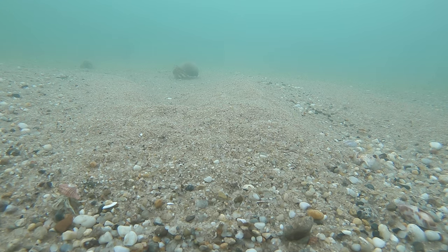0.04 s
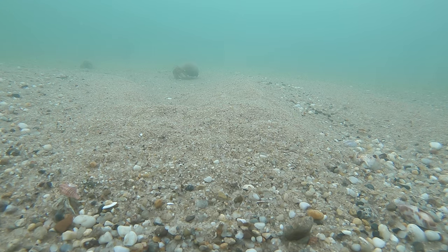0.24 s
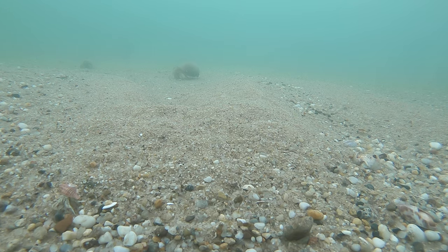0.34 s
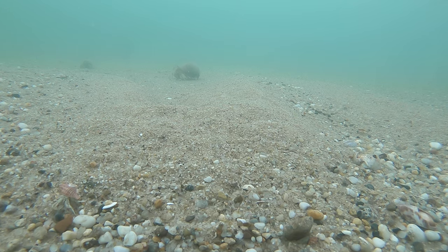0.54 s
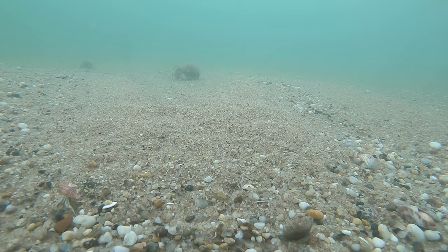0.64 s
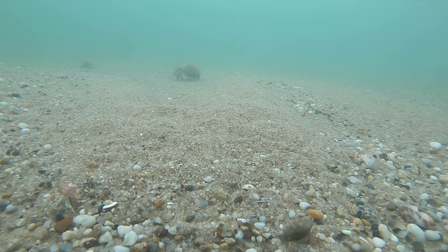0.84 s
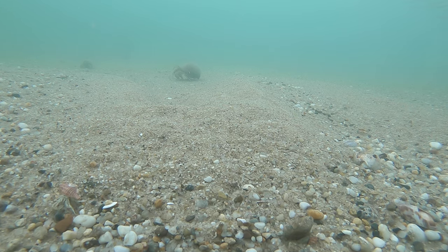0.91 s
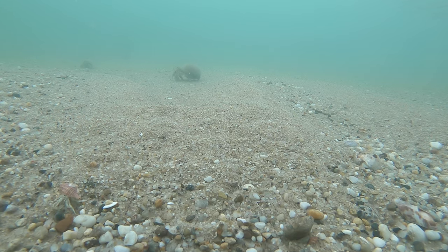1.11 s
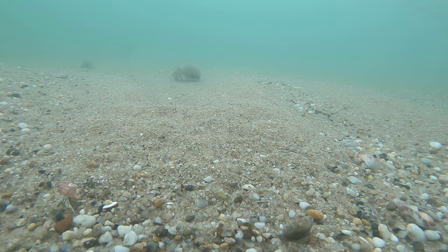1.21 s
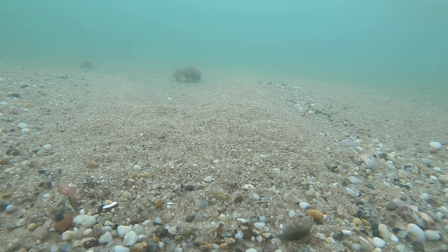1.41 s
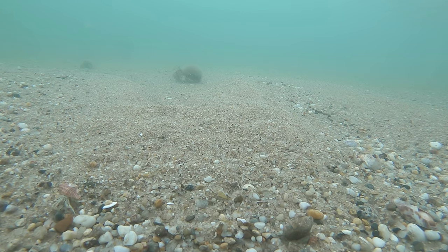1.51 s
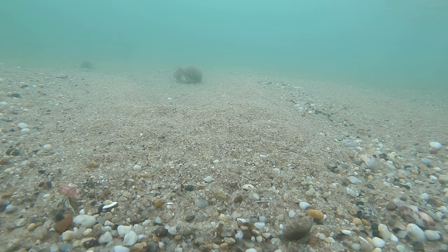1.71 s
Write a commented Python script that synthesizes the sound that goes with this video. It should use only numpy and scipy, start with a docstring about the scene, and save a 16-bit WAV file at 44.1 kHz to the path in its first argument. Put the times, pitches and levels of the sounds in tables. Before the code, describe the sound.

Muffled water churns and gulps over a sandy seabed, heard from inside a watertight camera housing. One hard thump comes early, then soft knocks, rubbing fingers and brushes of grit, over a steady sea wash and faint hiss.

```python
"""Just above a sandy seabed, heard close up on the two microphones of a camera in a watertight housing.
The housing rings with one hard thump and a few soft knocks; fingers rub and slip on its walls, and grit
brushes over it. Right outside, water gulps and churns against a steady wash of sea and a deep drone.
Under it all the camera's electronics hiss faintly, with a thin whine and a slight regular ticking."""
import sys
import numpy as np
from scipy import signal
from scipy.fft import rfft, irfft
from scipy.io import wavfile

SR = 44100
rng = np.random.default_rng(int(sys.argv[2]) if len(sys.argv) > 2 else 0)


def master_out(mix):
    """Clip the mix to full scale and print it as 16-bit PCM to the path in sys.argv[1]."""
    frames = np.transpose(np.atleast_2d(mix))
    ceiling = np.clip(frames, -1, 1)
    pcm = np.round(ceiling * 32767).astype(np.int16)
    wavfile.write(sys.argv[1], SR, pcm)


N = 77175
T = np.arange(N) / SR

# modes of the housing: (pitch [Hz], t60 [s], rise [s], left [dB], right [dB], right lag [rad])
HOUSING_MODES = [(57.6, .16, .008, -40, -47, 0.41), (145.5, 0.17, 0.013, -21, -21.5, .8),
                 (154, 0.1, 0.0028, -23, -33.5, 2.06), (249.6, 0.11, 0.012, 5, -30.5, 1.9),
                 (244.8, .055, 0.0039, -14.5, -2, 2.3), (510, 0.018, 0.00075, -20, -44, 5.4),
                 (670, 0.036, .0005, -22.5, -24.5, 2.4), (893, 0.033, 0.00062, -28.5, -22.5, 3.0),
                 (1150, 0.06, 0.00061, -37, -34.5, 2.6), (1340, .025, .0005, -40.5, -38.5, 1.5)]
# knocks on the housing: (time [s], relative level [dB], contact brightness [Hz])
KNOCKS = [(0.2271, -1.5, 1303), (0.2379, -25.5, 400), (0.394, -31.5, 650), (0.921, -30, 576),
          (1.147, -52, 505), (1.159, -23.5, 910), (1.273, -26, 402), (1.481, -24, 1500), (1.51, -31, 438),
          (1.69, -35, 447)]
# gulps against the housing: (time [s], level [dB], pitch [Hz], left minus right [dB])
GULPS = [(0.111, -44.5, 140, -3), (0.403, -42.5, 147, 7), (0.526, -38, 149, 7.5), (0.569, -47, 162, 9.5),
         (.838, -37, 113, 3.5), (.922, -44, 135, 1), (1.009, -41.5, 159, 7.5), (1.048, -37, 167, 1),
         (1.065, -43.5, 155, 4), (1.142, -36.5, 189, -6), (1.26, -59, 146, 5), (1.51, -63, 144, 1)]
# strength of the churning: (time [s], relative level [dB])
CHURN_STRENGTH = [(0, -53), (.12, -53), (.19, -50.5), (.24, -38.5), (.31, -48.5), (.36, -57.5), (.42, -51),
                  (.49, -53.5), (.58, -55.5), (.65, -56), (.77, -55.5), (.86, -48), (.94, -50), (.99, -49),
                  (1.07, -46.5), (1.11, -50.5), (1.16, -39), (1.22, -51.5), (1.3, -38), (1.37, -47),
                  (1.5, -40.5), (1.57, -51), (1.64, -54), (1.7, -45.5), (1.75, -47)]
# resonances the water stirs: (pitch [Hz], width [Hz], left [dB], right [dB], right lag [rad])
CHURN_MODES = [(151, 16, -2.5, -7.5, 1.3), (183.6, 37, -4.5, -3, 1.1), (256, 31.3, 0, -2.5, 1.92),
               (310.3, 39, -16.5, -7.5, 1.5), (368.5, 32, -19.5, -14, .8), (416.1, 45.5, -14.5, -16, 1.7)]
# finger pressure on the housing: (time [s], relative level [dB])
FINGER_PRESSURE = [(0, -71.5), (.06, -66), (.16, -69.5), (.21, -62.5), (.33, -74), (.41, -71), (.5, -76.5),
                   (.7, -72), (.8, -64), (.95, -67), (1.0, -68.5), (1.14, -61), (1.2, -73.5), (1.28, -65),
                   (1.42, -64), (1.48, -68.5), (1.55, -67), (1.75, -69.5)]
# flexing of the walls: (pitch [Hz], width [Hz], left [dB], right [dB], right lag [rad])
WALL_MODES = [(746, 147, 4.5, 2.5, 2.5), (843, 100, 4, 4, 2.543), (1180, 410, -3.5, -3, 2.78),
              (2135, 1700, -18.5, -20, 2.8)]
# finger slips: (time [s], relative level [dB])
SLIPS = [(.794, -49), (.813, -46.5), (.874, -46.5), (.911, -38), (.959, -44), (1.122, -45), (1.133, -46),
         (1.158, -66), (1.419, -45), (1.4795, -42)]
# strokes of grit: (time [s], level [dB], half length [s])
SWISHES = [(0.055, -62.5, 0.0096), (0.125, -69.5, .02), (0.204, -66, 0.015), (0.233, -63.5, 0.0097),
           (.845, -66.5, 0.0072), (0.919, -67.5, 0.014), (1.073, -66, 0.0072), (1.16, -65.5, 0.0074),
           (1.43, -69, 0.011), (1.482, -68.5, 0.014)]
# spectra of grit, sea and electronic hiss: (frequency [Hz], relative density [dB])
GRIT_SPECTRUM = [(400, -29.5), (900, 2.5), (1250, 0), (1700, -8), (3000, -12.5), (5000, -30),
                 (10000, -37.5)]
SEA_SPECTRUM = [(15, -28.5), (35, -9), (90, -15.5), (170, 7.5), (350, -23), (550, -18), (1000, -23),
                (2000, -23), (4000, -39), (8000, -56)]
HISS_SPECTRUM = [(1000, -22.5), (2200, -5), (3200, -1), (4700, -4), (5700, -1), (6600, 6.5), (7600, 1),
                 (8600, 0), (10000, -2.5), (13000, -8.5), (15500, -19)]
# the deep drone: (time [s], relative level [dB])
DRONE_LEVEL = [(0, -64.5), (.55, -65), (.9, -63), (1.2, -64), (1.45, -66.5), (1.75, -69.5)]
# the two ticks in each cycle of the electronics: (time into the cycle [s], relative level [dB])
TICKS = [(.002, -79), (.0097, -73)]
# bands in which ticks and crackle ring: (pitch [Hz], width [Hz], relative level [dB])
TREBLE_BANDS = [(6650, 1200, 0.5), (8600, 200, -13.5)]
# electronic whine: (pitch [Hz], level [dB])
WHINE_TONES = [(3621, -99), (7243, -100)]


def from_db(db):
    """Decibels to gain."""
    return 10 ** (np.asarray(db) / 20)


def unit_power(x):
    """Scale to unit power."""
    return x / np.sqrt(np.mean(np.abs(x) ** 2) + 1e-20)


def in_time(rows):
    """Join (time, value) rows by straight lines."""
    return np.interp(T, *np.transpose(rows))


def resonate(x, hz, width_hz):
    """Complex resonance applied twice, for steep skirts; unit power."""
    pole = np.exp((2j * np.pi * hz - np.pi * width_hz * np.pi / 2) / SR)
    run_in = np.concatenate([x[N // 2:], x])
    return unit_power(signal.lfilter([1], [1, -2 * pole, pole * pole], run_in)[-N:])


def noise_band(hz, width_hz):
    """A complex resonance driven by white noise; at 0 Hz, a random wobble."""
    return resonate(rng.standard_normal(N), hz, width_hz)


def at_mics(z, left_db, right_db, lag):
    """A complex vibration as the left and right microphones pick it up."""
    return np.real([from_db(left_db) * z, from_db(right_db) * z * np.exp(-1j * lag)])


def ring(start, hz, t60, rise_s):
    """A complex tone that builds up and dies away."""
    age = np.maximum(T - start, 0)
    build_up = 1 - np.exp(-age / rise_s)
    return -1j * build_up * np.exp((2j * np.pi * hz - np.log(1000) / t60) * age)


def stereo_noise(spectrum, correlation):
    """Steady noise of a given spectrum on both microphones; unit power."""
    hz, db = np.transpose(spectrum)
    gain = from_db(np.interp(np.log(np.fft.rfftfreq(N, 1 / SR) + 1), np.log(hz), db))
    mid, side = irfft(rfft(rng.standard_normal((2, N))) * gain, N)
    return unit_power(np.sqrt(1 + correlation) * mid + np.sqrt(1 - correlation) * side * [[1], [-1]])


def impulses(per_s, spread_db, cap_db):
    """Randomly timed impulses of either sign, mostly small."""
    sizes = from_db(np.minimum(rng.exponential(spread_db, N), cap_db))
    signs = rng.choice([-1, 1], N)
    return sizes * signs * (rng.random(N) < per_s / SR) + 1e-18


def knocks():
    """Each knock rings the housing around the microphones; a soft contact leaves out the upper modes."""
    body = sum(at_mics(ring(0, hz, t60, rise), *pickup) for hz, t60, rise, *pickup in HOUSING_MODES)
    out = np.zeros((2, N))
    for time, db, bright_hz in KNOCKS:
        start = int(time * SR)
        contact = signal.butter(4, bright_hz, fs=SR, output="sos")
        out[:, start:] += from_db(db) * signal.sosfilt(contact, body[:, :N - start] + 1e-18)
    return out


def crack(start_s=.2265, t60_s=.09):
    """A faint bright splat on top of the hard thump."""
    age = T - start_s
    level = (age > 0) * from_db(-66.5 - 60 * np.abs(age) / t60_s)
    return level * np.real([noise_band(3000, width_hz=3900) for mic in range(2)])


def gulps(low_cut_hz=81.4):
    """Water gulps against the housing, each time a low tone of a few cycles."""
    out = 0
    for time, db, hz, pan_db in GULPS:
        tone = ring(time, hz, t60=.072, rise_s=.0065)
        out += at_mics(tone / np.abs(tone).max(), db + pan_db / 2, db - pan_db / 2, lag=.2)
    low_cut = signal.butter(2, low_cut_hz, "high", fs=SR, output="sos")
    return signal.sosfilt(low_cut, out + 1e-18)


def churn(trim_db=-.5, tilt_per_octave=.38, pivot_hz=197, pivot_db=-48.5):
    """Lumpy water pressure stirs the low resonances; harder churning is brighter."""
    lumps_db = .5 * np.real(noise_band(0, width_hz=25))
    strength_db = in_time(CHURN_STRENGTH) + lumps_db
    out = 0
    for hz, width, *pickup in CHURN_MODES:
        tilt_db = tilt_per_octave * np.log2(hz / pivot_hz) * (strength_db - pivot_db)
        out += from_db(strength_db + trim_db + tilt_db) * at_mics(noise_band(hz, width), *pickup)
    return out


def rubbing(gain_db=5):
    """Dense stick-slip grains from the fingers flex the walls, the two sides opposed."""
    grains = impulses(per_s=3200, spread_db=1.5, cap_db=6)
    walls = sum((-1) ** k * at_mics(resonate(grains, hz, width), *pickup)
                for k, (hz, width, *pickup) in enumerate(WALL_MODES))
    return from_db(in_time(FINGER_PRESSURE) + gain_db) * walls


def slips(first_mode_t60_s=.032):
    """A slipping finger flicks the walls with a small hollow tock; wider modes die sooner."""
    out = 0
    for hz, width, left, right, lag in WALL_MODES:
        t60 = first_mode_t60_s * WALL_MODES[0][1] / width
        for time, db in SLIPS:
            out += at_mics(ring(time, hz, t60, rise_s=.0023), db + left, db + right, lag)
    return out


def swishes():
    """Grit brushes over the housing in short rough strokes."""
    strokes = sum(from_db(db) * np.exp(-((T - time) / half_s) ** 2 / 2) for time, db, half_s in SWISHES)
    roughness = from_db(2 * np.real(noise_band(0, width_hz=300)))
    return strokes * roughness * stereo_noise(GRIT_SPECTRUM, correlation=-.035)


def sea():
    """The steady wash of the sea all round, and a deep drone to the left that slowly fades."""
    drone = from_db(in_time(DRONE_LEVEL)) * noise_band(58.5, width_hz=14)
    wash = from_db(-62.5) * stereo_noise(SEA_SPECTRUM, correlation=.32)
    return wash + at_mics(drone, left_db=3.5, right_db=-3.5, lag=.27)


def electronics(cycle_hz=29.97, tick_half_s=.00065):
    """The camera's own noise floor: hiss, a thin whine and two short ticks of noise a cycle."""
    cycle_time = T % (1 / cycle_hz)
    gate = sum(from_db(db) * np.exp(-((cycle_time - time) / tick_half_s) ** 2 / 2) for time, db in TICKS)
    treble = sum(at_mics(noise_band(hz, width), db, db + 5.5, lag=-1.5) for hz, width, db in TREBLE_BANDS)
    whine = sum(from_db(db) * np.sqrt(2) * np.sin(2 * np.pi * hz * T) for hz, db in WHINE_TONES)
    hiss = from_db(-76.5) * stereo_noise(HISS_SPECTRUM, correlation=.12)
    return hiss + gate * treble + whine


def crackle():
    """Sparse tiny snaps in the water ring high up, louder on the right microphone."""
    snaps = impulses(per_s=45, spread_db=2.5, cap_db=7.5)
    return from_db(-84.5) * sum(at_mics(resonate(snaps, hz, width), db, db + 5.5, lag=-1.5)
                                for hz, width, db in TREBLE_BANDS)


def scene():
    """Everything that reaches the microphones inside the housing."""
    close_up = knocks() + gulps() + churn() + rubbing() + slips() + swishes()
    return close_up + sea() + electronics() + crack() + crackle()


def record(dry, cutoff_hz=15600):
    """The camera cuts the top treble steeply."""
    return signal.sosfilt(signal.ellip(10, .1, 80, cutoff_hz, fs=SR, output="sos"), dry)


dry = scene()
out = record(dry)
master_out(out)
```